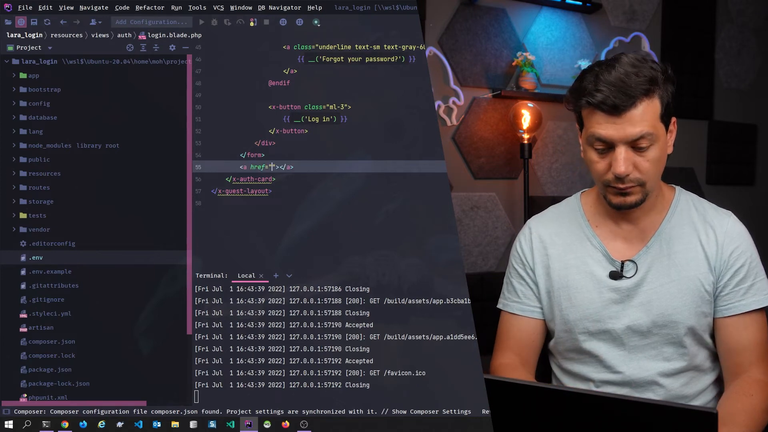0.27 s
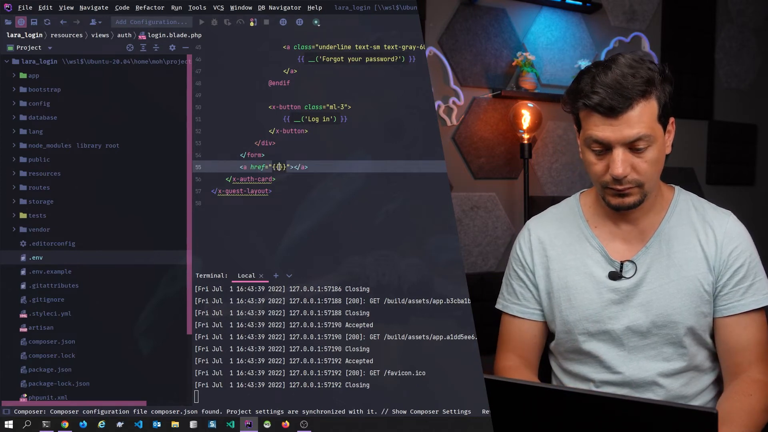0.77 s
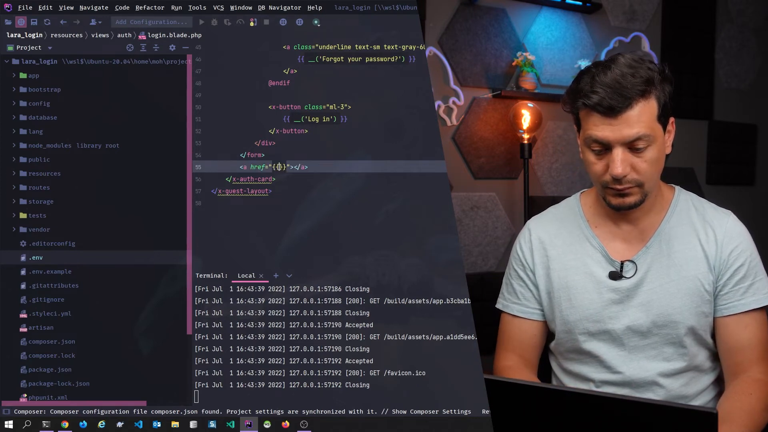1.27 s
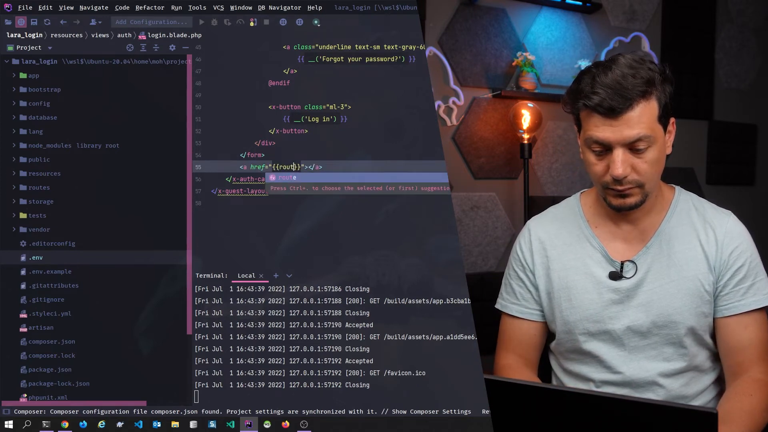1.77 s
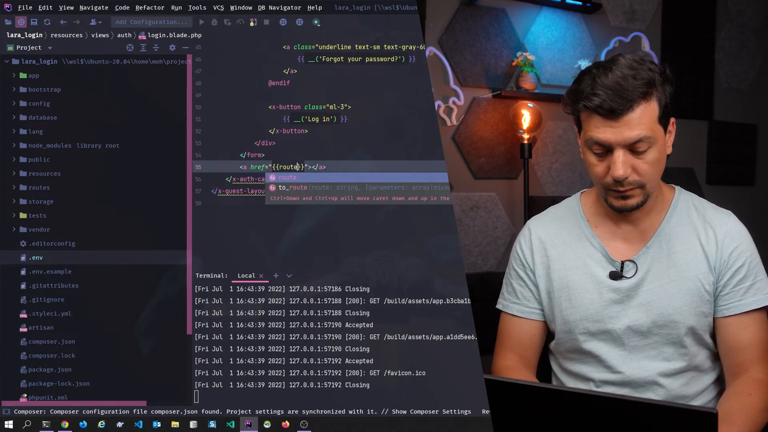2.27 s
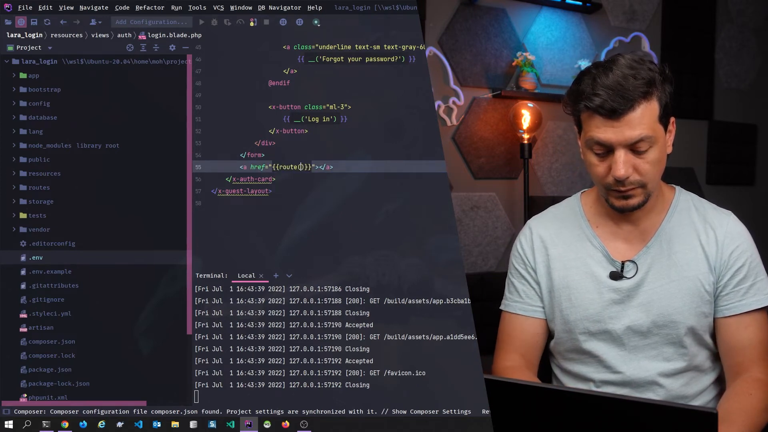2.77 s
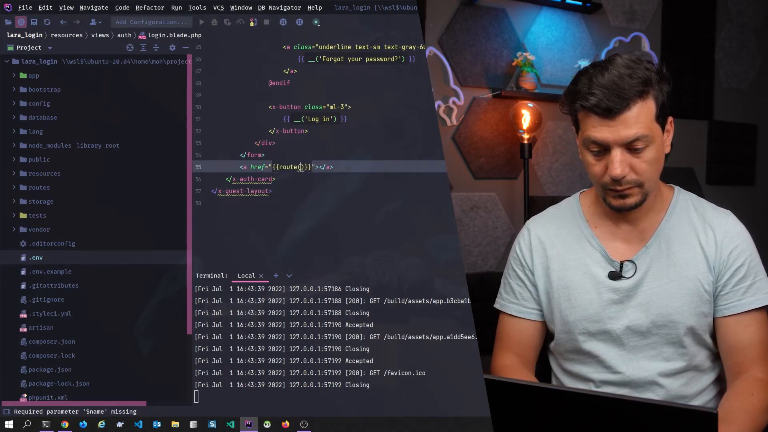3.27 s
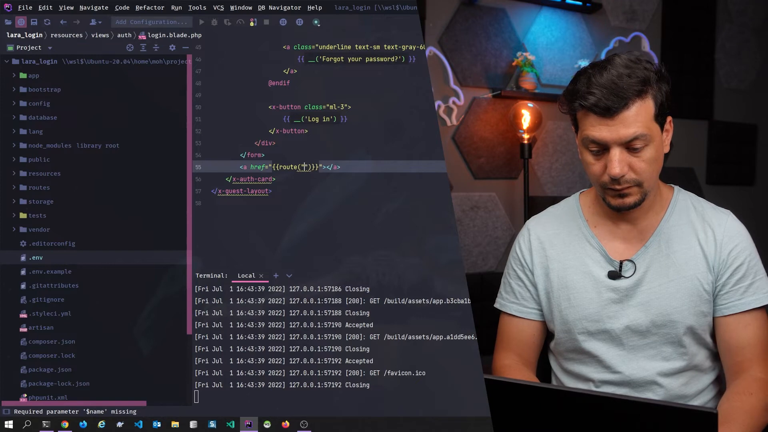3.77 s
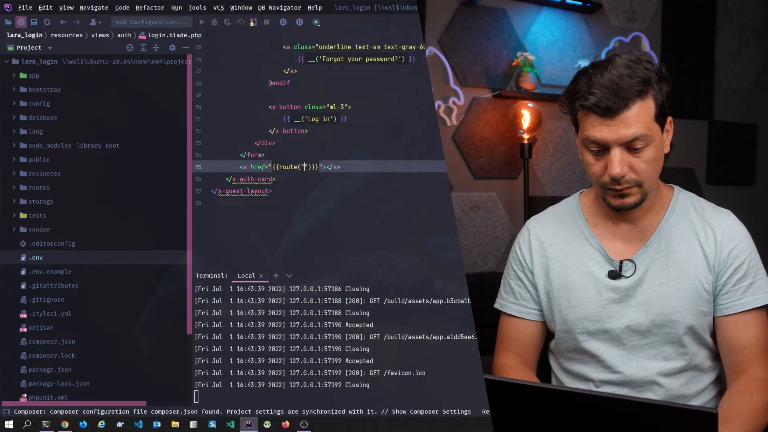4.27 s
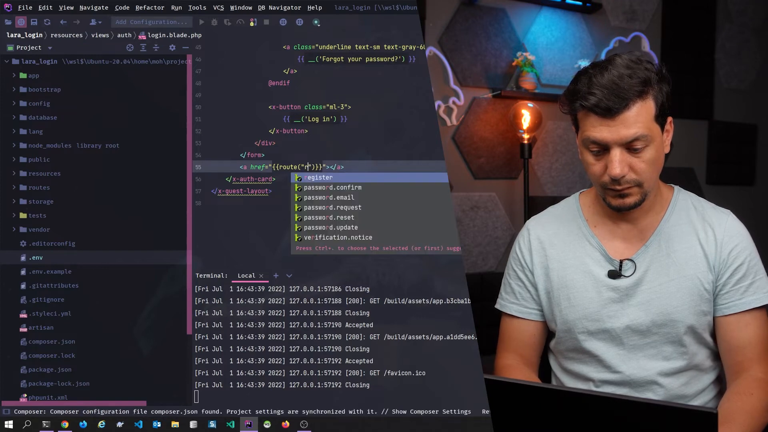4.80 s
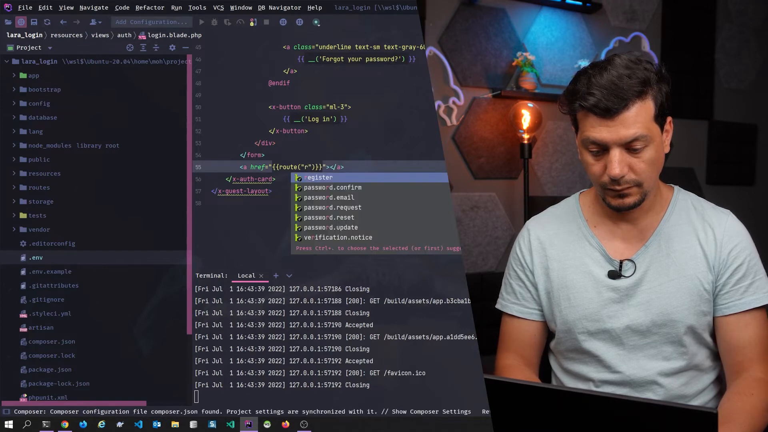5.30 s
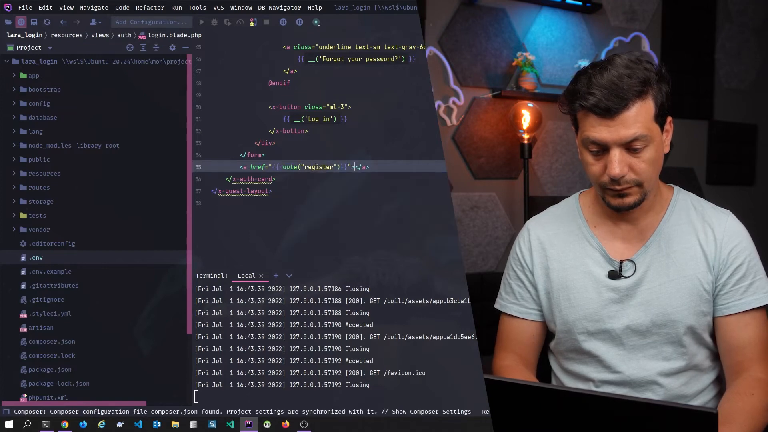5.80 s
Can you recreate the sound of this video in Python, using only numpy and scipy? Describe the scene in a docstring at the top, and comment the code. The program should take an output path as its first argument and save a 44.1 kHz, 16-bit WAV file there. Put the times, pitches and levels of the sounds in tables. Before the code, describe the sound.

Soft, irregular computer keyboard typing on a desk with faint ticks and thumps, then two loud hard key strikes near the end over quiet fan hiss.

```python
"""Soft typing on a low keyboard on a desk: each key ticks (filtered noise), clacks its cap (one resonance)
and thumps the desk (decaying modes). Some fingertips land without a key and only thump.
Near the end one key is struck hard twice: a scrape, a crack, the bark of the case, then its release.
A small room answers with decaying noise bands and standing waves.
Behind it, a computer fan hisses over a low rumble: shaped steady noise."""
import sys
import numpy as np
from scipy import signal
from scipy.fft import rfft, irfft
from scipy.io import wavfile
from scipy.ndimage import uniform_filter1d

SR = 44100
rng = np.random.default_rng(int(sys.argv[2]) if len(sys.argv) > 2 else 0)


def file_out(sig):
    """Save sig as 16-bit WAV at sys.argv[1]."""
    # one column per channel
    cols = np.atleast_2d(sig).T
    # limit, then scale
    lim = np.clip(cols, -1, 1)
    pcm = np.round(lim * 32767).astype(np.int16)
    wavfile.write(sys.argv[1], SR, pcm)


N = 266584

# light keystrokes: [t/s, level/dB, tick re level/dB, desk weight re level/dB, cap f/Hz, mechanism f/Hz]
KEYSTROKES = [(0.0932, -20, -11, 2.5, 2280, 7500), (0.099, -22.5, -12, 10.5, 1460, 5570),
              (0.1757, -23.5, -14.5, 3.5, 2230, 5500), (0.25, -28, -13, -2, 2520, 7300),
              (0.362, -24.5, -21, 3, 2160, 5300), (0.531, -30.5, -12, -1, 2530, 8260),
              (0.945, -25.5, -9, 0, 2500, 4820), (0.986, -36, -8, 18, 1490, 4800),
              (1.115, -31, -16, 4, 670, 6060), (1.156, -32.5, -0.5, 10, 2600, 4880),
              (1.2025, -29.5, -11, 5.5, 1410, 4900), (1.569, -27, -14.5, 1.5, 2900, 4770),
              (1.931, -22, 0.5, 1.5, 1490, 6000), (1.941, -23.5, -21, 5, 1810, 6000),
              (1.966, -31.5, -14, 8, 2420, 8000), (2.078, -36.5, -3, 3, 1680, 5200),
              (2.0864, -31, -1, 4, 515, 5470), (2.181, -36.5, -5, 6, 490, 6160),
              (2.985, -26, -8.5, -14, 736, 8200), (3.154, -27.5, -11.5, -7, 620, 4800),
              (3.2231, -28, -8, -3.5, 660, 7040), (3.489, -28, -10, -6, 2280, 5900),
              (3.7538, -28.5, -2, -10, 763, 5000), (3.8622, -20.5, -8, -4, 670, 7060),
              (3.884, -25, -22, -4, 720, 7500)]
# hard-struck key meets its stop: [t/s, level/dB, scrape on the way down/dB, hold/s]
HARD_BLOWS = [(4.9396, 2, -13.5, 0.1157), (5.28, 0.5, -13, 0.1085)]
# fingertips landing without a key: [t/s, weight level/dB]
FINGER_LANDINGS = [(0.265, -25.5), (0.778, -25.5), (0.923, -23.5), (2.018, -24.5), (3.278, -31),
                   (3.813, -24.5), (5.989, -26)]
# desk top modes: [nominal f/Hz, relative energy/dB, t60/s]
DESK_MODES = [(133.3, 5, 0.22), (200.8, -3, 0.35), (229.5, 1, 0.23), (500, -50, 0.11)]
# keyboard case modes under a hard blow: [nominal f/Hz, relative energy/dB, t60/s]
CASE_MODES = [(263, -3, 0.012), (475, 4, 0.029), (635, -6, 0.033), (876, 5, 0.039), (1092, -2, 0.052),
              (1340, 0.5, 0.018), (1730, 3, 0.012), (2098, 1.5, 0.032), (2355, -2.5, 0.026),
              (2480, -0.5, 0.016), (2830, -2, 0.017), (3176, -6, 0.0092)]
# standing waves of the room: [nominal f/Hz, relative energy/dB, t60/s]
ROOM_MODES = [(331, 7.5, 0.31), (330, -5.5, 0.65), (422, -21, 0.23), (510, 11.5, 0.22), (578, 4, 0.38),
              (680, -14, 0.091), (920, 2, 0.23), (970, -29, 0.68), (1490, -17, 0.24), (1764, 3, 0.46),
              (1800, -35, 0.1), (2760, -1, 0.075)]
# spectrum of the hard crack: [f/Hz, relative gain/dB]
CRACK_SPECTRUM = [(100, -2.5), (300, -3.5), (500, -2.5), (740, -8), (1000, -2.5), (1250, -7), (1800, -5.5),
                  (2600, -3), (3200, -7), (4000, -16.5), (5300, -20), (8000, -19), (11500, -20.5),
                  (16000, -39)]
# spectrum of the cap clack: [f/Hz, relative gain/dB]
CLACK_SPECTRUM = [(100, -24), (350, -4), (520, -0.5), (800, -1), (1050, -2.5), (1600, 1.5), (2600, -1),
                  (3700, -6.5), (8000, -56.5)]
# spectrum of the mechanism tick: [f/Hz, relative gain/dB]
TICK_SPECTRUM = [(1000, -5.5), (3600, -1.5), (5300, -0.5), (8300, 1.5), (11000, -5), (16000, -8.5)]
# fan and rumble: [f/Hz, density/dB per Hz]
AIR_DENSITY = [(5, -63), (11, -64.5), (22, -76.5), (70, -83), (190, -89), (330, -95), (800, -96.5),
               (2000, -96.5), (2500, -93.5), (2900, -99), (3400, -105), (5000, -110.5), (7500, -114),
               (16000, -118)]
# room reverberation: [f/Hz, t60/s]
ROOM_DECAY = [(200, 0.13), (1000, 0.28), (2500, 0.19), (7000, 0.19), (14000, 0.13)]

TOP_HZ = 15750
SIZE = 16384  # samples per single sound
AGE_S = np.arange(SIZE) / SR
# knock of the feet re weight: under a key, under a landing fingertip
KEY_KNOCK_DB, LANDING_KNOCK_DB = -8.5, -7
CONTACT_S, CAP_WIDTH_HZ = 0.004, 57  # every key: settling time of the cap, its bandwidth
# release of the hard-struck key: level, tick and weight re level, its two resonances
RELEASE_DB, RELEASE_TICK_DB, RELEASE_WEIGHT_DB = -26.5, -5, 5
RELEASE_CAP_HZ, RELEASE_PING_HZ = 480, 6500
REBOUND_S, REBOUND_DB = 0.01, -4  # rebound after the release: delay, level re release


def undb(db):
    """Decibels to gain."""
    return 10 ** (np.asarray(db) / 20)


def unit(x):
    """Scale to unit energy."""
    return x / np.sqrt(np.sum(x ** 2))


def read(table, hz):
    """Interpolate (Hz, value) points on a log-frequency axis."""
    points_hz, values = np.transpose(table)
    return np.interp(np.log(hz + 1e-3), np.log(points_hz), values)


def add(track, t_s, sound):
    """Mix a sound into the track at t_s."""
    start = int(t_s * SR)
    track[start:start + len(sound)] += sound[:N - start]


def decay(age_s, t60_s):
    """Exponential fade, 60 dB down after t60_s."""
    return np.exp(-np.log(1000) * age_s / t60_s)


def colour(x, spectrum):
    """Minimum-phase filter, built from the cepstrum of its log gain; unit energy out."""
    gain = undb(read(spectrum, np.fft.rfftfreq(SIZE, 1 / SR)))
    cepstrum = irfft(np.log(gain))
    # fold onto positive time: causal
    cepstrum[1:SIZE // 2] *= 2
    cepstrum[SIZE // 2 + 1:] = 0
    return unit(irfft(rfft(x) * np.exp(rfft(cepstrum))))


def resonate(x, hz, q):
    """One resonance excited by a contact."""
    b, a = signal.iirpeak(hz, max(q, 1), fs=SR)
    return unit(signal.lfilter(b, a, x))


def ring(modes, detune):
    """Decaying modes of given energies, randomly detuned; neighbours start in opposite directions."""
    shifts = 1 + detune * rng.standard_normal(len(modes))
    total = np.zeros(SIZE)
    for k, (hz, db, t60_s) in enumerate(modes):
        mode = np.sin(2 * np.pi * hz * shifts[k] * AGE_S) * decay(AGE_S, t60_s)
        total += (-1) ** k * undb(db) * unit(mode)
    return unit(total)


def burst(rise_s, fall_s):
    """Rough contact: enveloped noise, its spectrum evened out while it keeps its envelope."""
    shape = (1 - np.exp(-AGE_S / rise_s)) * np.exp(-AGE_S / fall_s)
    x = rng.standard_normal(SIZE) * shape
    for _ in range(2):
        x = irfft(np.exp(1j * np.angle(rfft(x))))  # flat spectrum
        power = np.abs(uniform_filter1d(x ** 2, size=64))
        x *= shape / np.sqrt(power + 1e-12)
    return unit(x)


def air():
    """Steady fan hiss over low rumble: Gaussian noise shaped to a density."""
    density = undb(read(AIR_DENSITY, np.fft.rfftfreq(N, 1 / SR)))
    return irfft(rfft(rng.standard_normal(N)) * density, N) * np.sqrt(SR / 2)


def room(x, wet_db, standing_db, gap_s, build_s):
    """Room return: dense wall reflections that fade band by band, plus standing waves."""
    hz = np.fft.rfftfreq(SIZE, 1 / SR)
    late_s = np.maximum(AGE_S - gap_s, 0)
    build = 1 - np.exp(-late_s / build_s)
    noise = np.exp(2j * np.pi * rng.random(len(hz)))
    diffuse = np.zeros(SIZE)
    edges_hz = np.r_[0, np.geomspace(250, SR / 2, 14)]
    for lo_hz, hi_hz in zip(edges_hz, edges_hz[1:]):
        fade = decay(late_s, read(ROOM_DECAY, (lo_hz + hi_hz) / 2))
        band = irfft(noise * ((hz >= lo_hz) & (hz < hi_hz)))
        diffuse += np.sqrt(hi_hz - lo_hz) * unit(band * build * fade)
    standing = unit(build * ring(ROOM_MODES, detune=0.0012))
    response = unit(diffuse) + undb(standing_db) * standing
    return undb(wet_db) * signal.fftconvolve(x, response)[:N]


def thump(push_s):
    """Fingertip push on the desk modes; a longer push favours the low ones."""
    push = AGE_S * np.exp(-AGE_S / push_s)
    return unit(signal.fftconvolve(ring(DESK_MODES, detune=0.027), push)[:SIZE])


def knock(hz, t60_s, rise_s):
    """Keyboard bouncing on its rubber feet: a few cycles of a damped sine."""
    onset = 1 - np.exp(-AGE_S / rise_s)
    return unit(np.sin(2 * np.pi * hz * AGE_S) * onset * decay(AGE_S, t60_s))


def sway(weight_db, knock_db):
    """Finger weight: desk thump plus knock of the feet."""
    feet = knock(hz=248, t60_s=0.024, rise_s=0.0031)
    return undb(weight_db) * (thump(push_s=0.00098) + undb(knock_db) * feet)


def bend(x, lag_s):
    """Dispersion of bending waves in the case, treble first; lag_s is the travel time at 1 kHz."""
    hz = np.fft.rfftfreq(SIZE, 1 / SR)
    return irfft(rfft(x) * np.exp(-4j * np.pi * lag_s * np.sqrt(1000 * hz)))


def hard_strikes():
    """One key twice: it scrapes down its guide, slams into the case and shakes the desk."""
    near, far = np.zeros(N), np.zeros(N)
    crack = colour(burst(rise_s=0.0011, fall_s=0.0027), CRACK_SPECTRUM)
    travel_s, lead_s, bounce_s, wall_s = 0.004, 0.000987, 0.002437, 0.03
    for t_s, db, scrape_db, _ in HARD_BLOWS:
        slide = burst(rise_s=0.008, fall_s=0.0057)
        scrape = colour(slide, TICK_SPECTRUM) + colour(slide, CLACK_SPECTRUM)
        add(near, t_s - travel_s, undb(scrape_db) * scrape)
        case = undb(db - 2.5) * bend(ring(CASE_MODES, detune=0.004), lag_s=0.002034)
        add(near, t_s - lead_s, case)
        add(near, t_s - lead_s + bounce_s, -undb(-4.5) * case)  # bounce on the stop
        add(near, t_s + wall_s, undb(-15) * case)  # distinct far-wall return
        rattle = colour(burst(rise_s=0.0037, fall_s=0.0022), TICK_SPECTRUM)
        add(near, t_s, undb(db - 14.0) * rattle + undb(db - 16.5) * thump(push_s=0.00012))
        add(far, t_s, undb(db) * crack)  # heard only through the room
    return near + room(far, wet_db=-6.5, standing_db=-16.5, gap_s=0.00041, build_s=0.00089)


def releases():
    """After each hold the hard-struck key springs up and rebounds: two light touches."""
    touches = []
    for t_s, _, _, held_s in HARD_BLOWS:
        for lag_s, db in ((0, 0), (REBOUND_S, REBOUND_DB)):
            touches.append((t_s + held_s + lag_s, RELEASE_DB + db, RELEASE_TICK_DB,
                            RELEASE_WEIGHT_DB, RELEASE_CAP_HZ, RELEASE_PING_HZ))
    return touches


def chatter(contact_s, uneven_db):
    """Loose cap settling in uneven bumps, 64 samples (about 1.5 ms) each."""
    bumps = np.repeat(rng.standard_normal(SIZE // 64), 64)
    return unit(burst(rise_s=contact_s / 2, fall_s=contact_s) * undb(uneven_db * bumps))


def typing():
    """Light touches: the mechanism ticks, the cap clacks, feet and desk take the finger's weight."""
    clicks, body = np.zeros(N), np.zeros(N)
    for t_s, db, tick_db, weight_db, cap_hz, ping_hz in KEYSTROKES + releases():
        contact = chatter(CONTACT_S, uneven_db=4)
        ping = resonate(contact, ping_hz, q=11)
        tick = unit(colour(contact, TICK_SPECTRUM) + undb(-5.5) * ping)
        clack = colour(contact, CLACK_SPECTRUM)
        add(clicks, t_s, undb(db + tick_db) * tick + undb(db - 2.5) * clack)
        cap = resonate(contact, cap_hz, q=cap_hz / CAP_WIDTH_HZ)
        add(body, t_s, undb(db - 5.0) * cap)
        add(body, t_s, sway(db + weight_db, KEY_KNOCK_DB))
    for t_s, db in FINGER_LANDINGS:
        add(body, t_s, sway(db, LANDING_KNOCK_DB))
    # only the clicks excite the room
    return clicks + body + room(clicks, wet_db=-5, standing_db=-11.5, gap_s=0.0026, build_s=0.0025)


def scene():
    """Keys and room air, summed to one channel."""
    return (typing() + hard_strikes() + air())[None]


def record(dry):
    """The recorder cuts the top: steep elliptic low-pass at TOP_HZ."""
    low_pass = signal.ellip(10, .1, 70, TOP_HZ, fs=SR, output="sos")
    return signal.sosfilt(low_pass, dry)


dry = scene()
out = record(dry)
file_out(out)
```